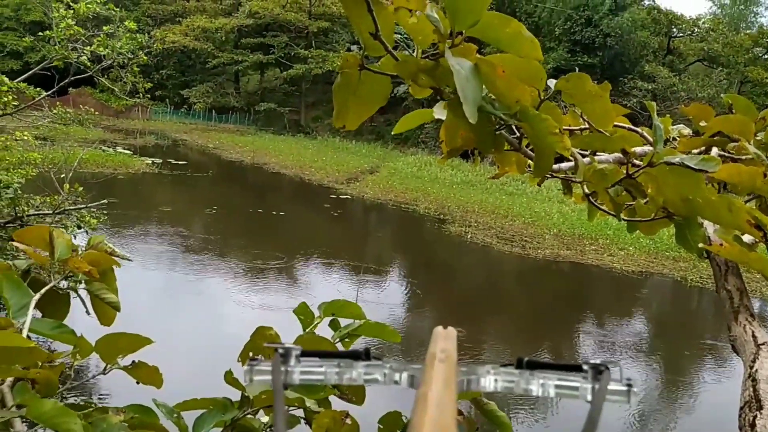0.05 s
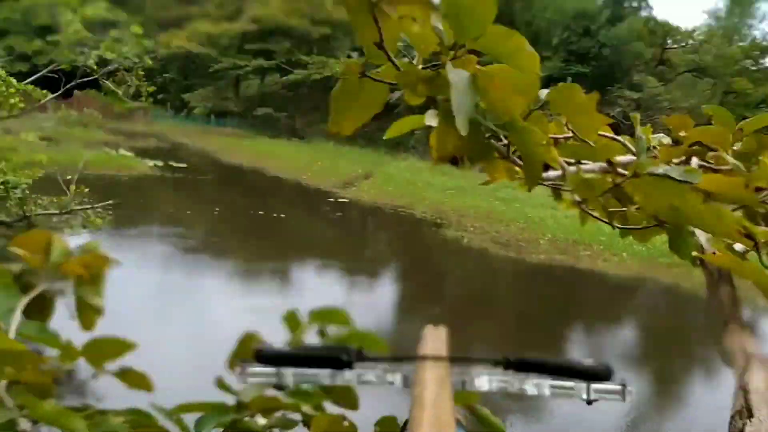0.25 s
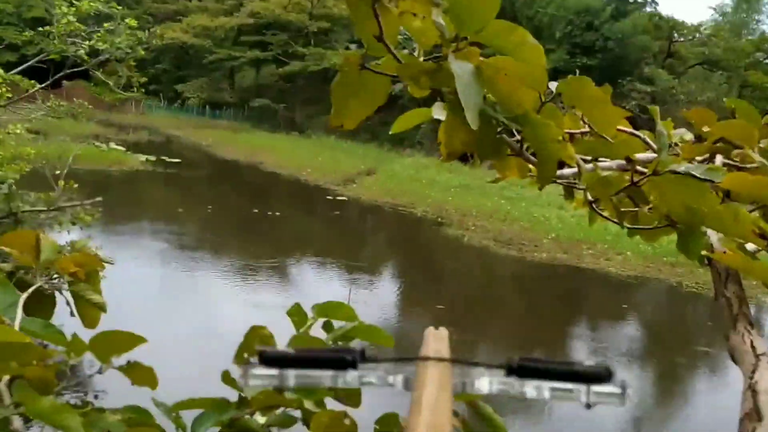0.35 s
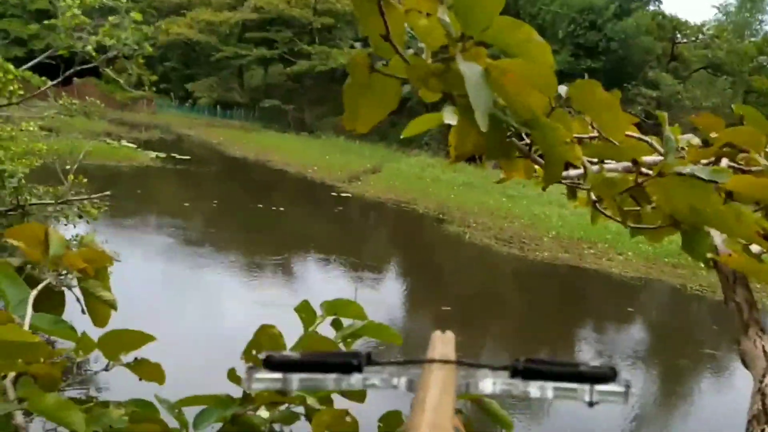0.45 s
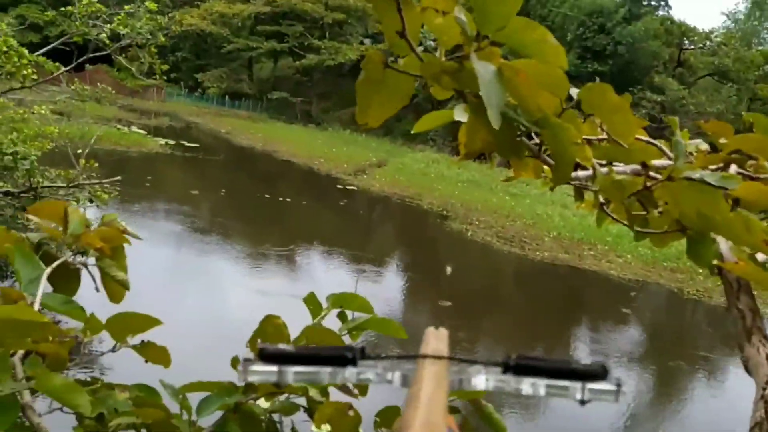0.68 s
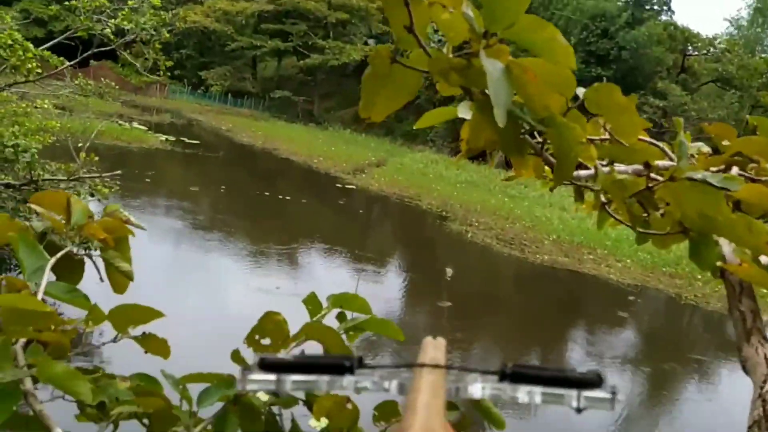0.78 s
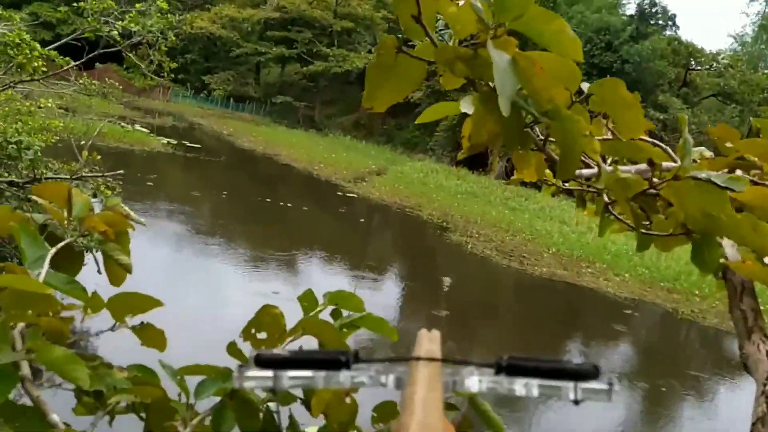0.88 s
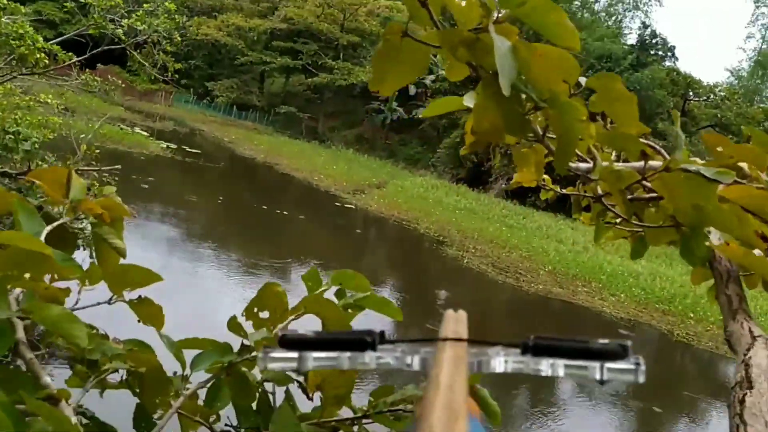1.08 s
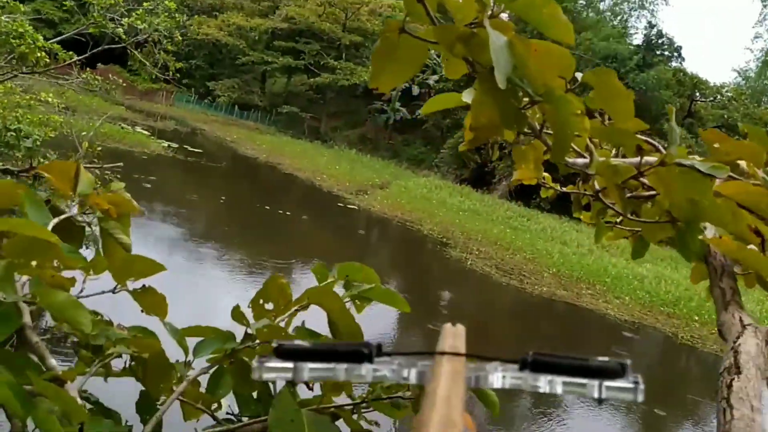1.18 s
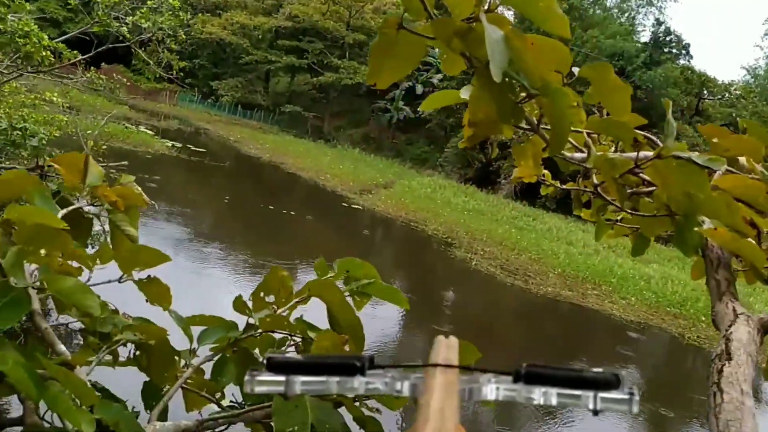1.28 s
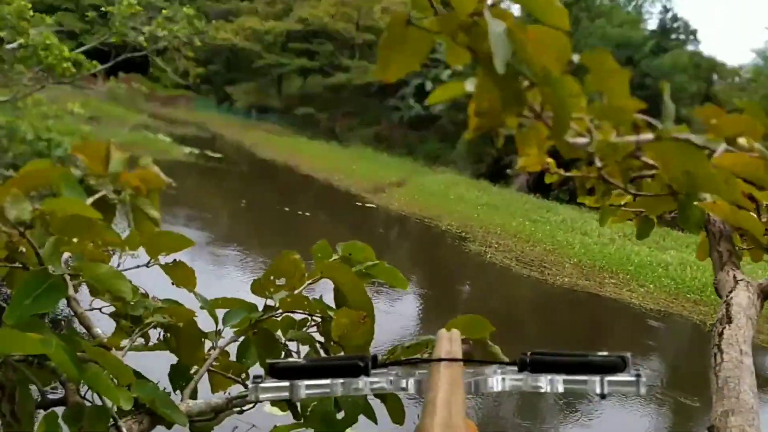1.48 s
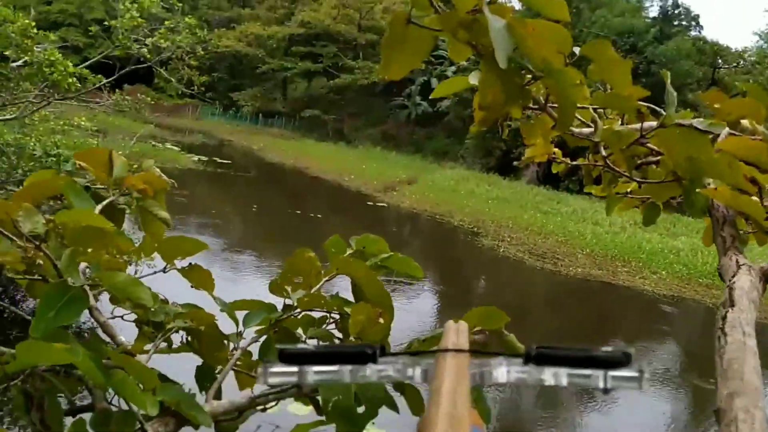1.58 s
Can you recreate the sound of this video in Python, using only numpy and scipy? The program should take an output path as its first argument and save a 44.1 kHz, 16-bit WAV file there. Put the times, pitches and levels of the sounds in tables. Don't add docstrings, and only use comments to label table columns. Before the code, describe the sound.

A homemade crossbow fires right beside a small camera microphone: hard latch snap, overloaded band slaps, whirring reel and running line, a metallic knock, then soft handling thumps and wooden creaks by a quiet pond.

```python
import sys
import numpy as np
from scipy import signal
from scipy.fft import rfft, irfft
from scipy.io import wavfile
from scipy.ndimage import uniform_filter1d

SR = 44100
rng = np.random.default_rng(int(sys.argv[2]) if len(sys.argv) > 2 else 0)


def attenuation_scalar(level_db):
    decades = np.asarray(level_db, float) / 20
    return 10 ** decades


def waveform_to_disk(signal):
    frames = np.transpose(np.atleast_2d(signal))
    scaled = np.clip(frames, -1, 1) * 32767
    samples = np.round(scaled).astype(np.int16)
    wavfile.write(sys.argv[1], SR, samples)


N = 72765


def unit_rms(x):
    return x / np.sqrt(np.mean(x ** 2) + 1e-20)


def curve(table, column):
    columns = np.transpose(table)
    return np.interp(np.arange(N) / SR, columns[0], columns[column])


def span(table):
    t = np.arange(N) / SR
    opening = np.clip((t - table[0][0]) / 0.0018, 0, 1)
    closing = np.clip((table[-1][0] - t) / 0.042 + 1, 0, 1)
    return opening * closing


def coloured(x, points):
    f, db = np.transpose(points)
    hz = np.fft.rfftfreq(len(x), 1 / SR) + 1
    gain = attenuation_scalar(np.interp(np.log(hz), np.log(f), db, -60, -90))
    return unit_rms(irfft(rfft(x) * gain, len(x)))


def add(mix, s, sound):
    part = mix[round(s * SR):][:len(sound)]
    part += sound[:len(part)]


def resonate(x, hz, width):
    r = np.exp(-np.pi * width / SR)
    return signal.lfilter([1 - r, 0, r - 1], [1, -2 * r * np.cos(2 * np.pi * hz / SR), r * r], x)


def resonate_twice(x, hz, width):
    return unit_rms(resonate(resonate(x, hz, width), hz, width))


def clicks(per_s, spread_db):
    chance, sign, size = rng.random((N, 3)).T
    return (chance < per_s / SR) * np.sign(sign - .5) * attenuation_scalar(-spread_db * np.log(size + 0.01))


def ringing(t, modes):
    return sum(attenuation_scalar(db - 60 * t / t60) * np.sin(2 * np.pi * hz * t) for hz, db, t60 in modes)


def knock(peaks, db, rise_s, hold_s, t60):
    t = np.arange(0, .12, 1 / SR)
    chatter = rng.standard_normal(len(t)) * (rng.random(len(t)) < .2)
    body = unit_rms(sum(attenuation_scalar(level) * resonate_twice(chatter, hz, 2 * width) for hz, width, level in peaks))
    return np.minimum(t / rise_s, 1) ** 2 * attenuation_scalar(db - 60 * np.maximum(t - hold_s, 0) / t60) * body


def wooden_knocks(table):
    out, t = np.zeros(N), np.arange(0, .08, 1 / SR)
    noise = rng.standard_normal((len(table), len(t)))
    for (s, db, hz, t60, treble_db), n in zip(table, noise):
        mode = np.sin(2 * np.pi * hz * t) + .45 * resonate_twice(n, hz, 800)
        tick = resonate_twice(n, 3600, 6500) * attenuation_scalar(treble_db - 60 * t / .006)
        rise_s, hold_s = .0012, .003
        shape = np.minimum(t / rise_s, 1) * attenuation_scalar(-60 * np.maximum(t - hold_s, 0) / t60)
        add(out, s, attenuation_scalar(db) * (shape * mode + tick))
    return out


# (frequency [Hz], density [dB per Hz])
OPEN_AIR = [(18, -50), (30, -33), (75, -0.5), (243, -9), (372, -6.5), (639, -24), (3390, -28.5),
            (5430, -12), (8300, -27), (10800, -54), (18300, -120)]


def pond():
    air_db, insect_db, throb_db = -60.5, -69.5, 1
    air_noise, wings, drift = rng.standard_normal((N, 3)).T
    throb = attenuation_scalar(throb_db * unit_rms(uniform_filter1d(drift, 900)))
    insects = resonate_twice(wings, 5160, 270)
    return attenuation_scalar(air_db) * coloured(air_noise, OPEN_AIR) + attenuation_scalar(insect_db) * throb * insects


# (time [s], level [dB], pitch [Hz], length [s])
THUMPS = [(0.228, -10.5, 61.9, 0.062), (0.258, -6, 89.3, 0.047), (0.321, -12.5, 77.3, .09),
          (.275, -13.5, 202, 0.026), (0.289, -16.5, 282, 0.034), (.345, -17.5, 84.1, 0.09),
          (0.461, -23, 85, 0.055), (0.58, -46, 68.7, 0.091), (0.771, -43, 78.3, 0.22),
          (0.881, -29, 79.4, 0.037), (0.914, -31.5, 68.8, 0.076), (0.982, -43, 64, 0.15),
          (1.079, -29, 80, 0.06), (1.12, -31.5, 71.4, 0.062), (1.168, -21, 115, 0.019),
          (1.181, -25.5, 61.6, 0.032), (1.216, -32, 59.6, 0.072), (1.3, -37, 69, 0.03),
          (1.351, -28, 77.3, 0.068), (1.415, -31.5, 66, 0.042), (1.465, -40, 70, 0.028),
          (1.497, -45, 65, .05), (1.539, -32, 347, 0.017), (1.54, -29.5, 197.4, 0.039),
          (1.562, -26.5, 75, 0.046), (1.591, -28.5, 66.5, 0.067)]


def low_thumps():
    out = np.zeros(N)
    noise = rng.standard_normal((len(THUMPS), 9000))
    for (s, db, hz, length), n in zip(THUMPS, noise):
        u = np.arange(0, min(2 * length, .2), 1 / SR) / length
        rough = unit_rms(resonate(n, 1.55 * hz, 47))[:len(u)]
        swing = np.sin(2 * np.pi * hz * length * u) + 0.15 * rough
        swell = 30 * u ** 2 * np.exp(-5 * u) * np.cos(u * np.pi / 4)
        add(out, s, attenuation_scalar(db) * swell * swing)
    return out


# (time [s], peak level [dB], pitch [Hz], t60 [s], treble [dB])
HAND_CREAKS = [(.895, -41, 935, 0.033, -20), (1.018, -51, 891, 0.018, -25), (1.038, -41, 747, 0.051, -24),
               (1.086, -44, 1163, .03, -21), (1.169, -41, 931, 0.029, -26.5), (1.184, -40, 800, 0.017, -27),
               (1.23, -44, 1300, 0.059, -28), (1.2762, -30.5, 923, 0.0099, -36),
               (1.2775, -58, 2220, .015, -30), (1.306, -33.5, 824, .03, -31),
               (1.311, -35, 1923, 0.015, -1.5), (1.312, -44, 3200, 0.0073, -32.5),
               (1.3145, -31.5, 1054, 0.055, -20), (1.3505, -38, 1300, 0.017, -37),
               (1.351, -48, 2000, 0.013, -20), (1.3758, -29, 1002, 0.023, -9.5),
               (1.377, -55, 2250, 0.017, -22), (1.379, -50.5, 2690, 0.038, -25),
               (1.4396, -45, 1010, 0.018, 7), (1.5175, -36.5, 923, 0.027, -27),
               (1.518, -46.5, 2350, .012, -21), (1.5225, -41, 1000, .03, -33),
               (1.539, -40, 1005, 0.024, -20), (1.554, -32, 947, 0.031, -24),
               (1.58, -35.5, 1100, 0.029, -15), (1.593, -43.5, 1096, .06, -28),
               (1.6235, -40, 840, 0.026, -37), (1.6358, -28.5, 800, 0.025, -21),
               (1.637, -37, 1395, .018, -30)]


def creaks():
    return wooden_knocks(HAND_CREAKS)


# (time [s], turning tone [Hz], level [dB])
SPOOL_TURN = [
    (.33, 274.6, -33.5),
    (.43, 249.8, -38),
    (.504, 230.1, -40.5),
    (.566, 218.2, -28.5),
    (.588, 218, -33),
    (.603, 216.5, -21.5),
    (.64, 206, -39),
    (.67, 213.5, -41),
    (.72, 221, -62),
]
# (multiple of turning tone, level [dB])
FRAME_BUZZ = [(2, -35), (3, -36)]
# (time [s], reel rattle [dB], line hiss [dB])
LINE_RUN = [(.3, -26, -58), (.4, -36.5, -43), (.52, -34.5, -47), (.58, -41, -47), (.67, -41, -48.5),
            (.755, -40, -52.5), (.775, -47, -58), (.8, -43.5, -59), (.9, -45, -51.5), (.99, -50, -61),
            (1.14, -56, -70), (1.24, -48.5, -62), (1.34, -48.5, -63), (1.49, -53.5, -66),
            (1.535, -48, -58.5), (1.56, -41.5, -46), (1.6, -52.5, -57.5), (1.65, -43, -98)]
# (frequency [Hz], width [Hz], level [dB])
HOUSING = [(411.6, 51, 8.5), (642.6, 25, 7.5), (800, 47, 9.5), (1050, 60, 12), (1300, 120, 12),
           (1680, 130, -2.5)]
# (frequency [Hz], density [dB per Hz])
LINE_HISS = [(1000, -41), (1800, 3.5), (2500, -2), (3400, -0.5), (4300, -7.5), (5400, -2.5), (7600, -3.5),
             (8600, -22.5)]
# (time [s], level [dB])
HANDLE = [
    (.6, -45),
    (.66, -46.5),
    (.72, -42),
    (.765, -57),
    (.8, -80),
]


def reel():
    t = np.arange(N) / SR
    turn = 2 * np.pi * np.cumsum(curve(SPOOL_TURN, column=1)) / SR
    tone = np.sin(turn) * attenuation_scalar(curve(SPOOL_TURN, column=2)) * span(SPOOL_TURN)
    buzz = sum(attenuation_scalar(db) * np.sin(k * turn) for k, db in FRAME_BUZZ)
    buzz = buzz * np.exp(-((t - .603) / .012) ** 2)

    knocks = clicks(per_s=810, spread_db=2.5)
    rattle = 0
    for hz, width, db in HOUSING:
        settle_db = -3 * (hz > 1200) * np.clip(10 * (t - 1.32), 0, 1)
        rattle = rattle + attenuation_scalar(db) * resonate_twice(knocks, hz, 2.2 * width) * attenuation_scalar(settle_db)
    rattle = unit_rms(rattle)
    handle = resonate_twice(knocks, 1378, 120) * attenuation_scalar(curve(HANDLE, column=1)) * span(HANDLE)

    hiss = coloured(clicks(per_s=2000, spread_db=0), LINE_HISS)
    rumble = attenuation_scalar(-17) * resonate_twice(rng.standard_normal(N), 70, 60)
    running = (rattle + rumble) * attenuation_scalar(curve(LINE_RUN, column=1)) + hiss * attenuation_scalar(curve(LINE_RUN, column=2))
    return np.sqrt(2) * (tone + buzz) + running * span(LINE_RUN) + handle


# (frequency [Hz], width [Hz], level [dB])
STOP_PEAKS = [(1300, 400, 0.5), (1930, 89, -3), (3300, 400, -5), (4600, 260, -19.5), (5610, 230, -10),
              (6320, 480, -13.5), (7270, 230, -22)]
# (frequency [Hz], level [dB], t60 [s])
STOP_BODY = [(745, -4, 0.035), (1266, -6.5, 0.052), (395, -6, 0.024)]
# (frequency [Hz], level [dB], t60 [s])
METAL_RING = [(2013, -17, .16), (3661, -42, .8)]


def metal_stop():
    out, t = np.zeros(N), np.arange(0, .5, 1 / SR)
    hit_s, ring_lag_s = .4812, .006
    add(out, hit_s, knock(STOP_PEAKS, db=-10.5, rise_s=0.0005, hold_s=0.0051, t60=0.019))
    add(out, hit_s, np.minimum(t / 0.0051, 1) * ringing(t, STOP_BODY))
    add(out, hit_s + ring_lag_s, np.minimum(t / 0.0062, 1) * ringing(t, METAL_RING))
    return out


# (time [s], peak level [dB], pitch [Hz], t60 [s], treble [dB])
NEAR_KNOCKS = [(0.2324, -19.5, 2058, 0.033, -33), (.2485, -8, 495, 0.015, -4.5),
               (.2565, -9, 450, 0.012, -9), (.262, -10.5, 700, 0.022, -20.5),
               (.2685, -9.5, 880, 0.028, -11.5), (.2795, -6, 781, 0.038, -1.5),
               (.2915, -2.5, 670, 0.022, -27.5), (.293, -23, 2870, .012, -20),
               (.283, -12.5, 600, 0.034, -24), (.3005, -9, 800, 0.075, -28),
               (.3145, -29.5, 750, .02, -6.5), (.318, -31.5, 710, .02, 1),
               (.3215, -13, 653, 0.012, -19.5), (.3305, -12, 800, 0.025, -15.5),
               (.3435, -20.5, 800, 0.024, -4), (.357, -24, 745, 0.04, 1.5),
               (.4325, -27.5, 1050, 0.022, -21), (.452, -30, 1140, 0.048, -22),
               (0.4705, -18, 800, 0.0061, -9.5), (.4745, -19.5, 1070, 0.045, -26),
               (0.4813, -17, 1232, .026, 11), (.4815, -16, 5950, 0.006, -4),
               (.491, -16.5, 1085, 0.02, -28), (.5145, -20.5, 930, 0.02, -10.5),
               (0.671, -31, 1334, 0.015, -23), (0.693, -40.5, 1300, 0.028, 3.5),
               (0.711, -34, 1350, 0.035, -6), (.786, -38, 677, 0.056, -25),
               (.787, -41, 1300, 0.051, -20)]


def slaps_and_knocks():
    return wooden_knocks(NEAR_KNOCKS)


# (frequency [Hz], width [Hz], level [dB])
LATCH_PEAKS = [(1332, 130, -27), (2075, 240, 4), (2910, 75, -5.5), (3550, 100, -8), (4830, 330, -0.5),
               (6290, 710, 6.5), (6920, 100, -5.5), (6920, 66, -12.5)]
# (time [s], level [dB])
STOCK_SHAKE = [
    (.236, -19),
    (.25, -16),
    (.283, -10),
    (.305, -20.5),
    (.318, -24.5),
    (.336, -24),
    (.35, -43),
    (.385, -27.5),
    (.42, -62),
]
# (frequency [Hz], level [dB], t60 [s], extra fade once bands are slack [dB/s])
STOCK_MODES = [(230.5, -13.5, 0.22, 292.5), (323, 5.5, 0.013, 252), (456.7, -0.5, 0.037, 147.5),
               (555, 4, 0.025, 61), (665.4, -1.5, 0.32, 4.5), (796, -4, 0.009, 1), (920, -17, 0.013, 24.5),
               (1043, -6.5, 0.054, 60), (1200, -30, .04, 101.5)]
# (frequency [Hz], density [dB per Hz])
RAIL_RASP = [(530, -36), (900, -0.5), (1290, 3.5), (1590, -3.5), (2180, -2.5), (7150, -12), (8300, -22.5),
             (10800, -53), (18300, -120)]


def release():
    t = np.arange(N) / SR
    slack = np.clip(t - .275, 0, .08)
    slaps = clicks(per_s=700, spread_db=-1.5)
    wood = 0
    for hz, db, t60, fade in STOCK_MODES:
        wood = wood + attenuation_scalar(db) * unit_rms(resonate(slaps, hz, 1.2 / t60)) * attenuation_scalar(-fade * slack)
    wood = unit_rms(wood)

    rasp_db, rasp_hold_s, rasp_fall_db_s = -12, 0.2637, 456.5
    rasp = coloured(clicks(per_s=4500, spread_db=2.7), RAIL_RASP)
    rasp = rasp * attenuation_scalar(rasp_db - rasp_fall_db_s * np.maximum(t - rasp_hold_s, 0))
    out = (wood * attenuation_scalar(curve(STOCK_SHAKE, column=1)) + rasp) * span(STOCK_SHAKE)
    add(out, .2325, knock(LATCH_PEAKS, db=-3.5, rise_s=0.0028, hold_s=0.0031, t60=0.054))
    return out


def bank_echo(near):
    level_db, t60 = -30.5, 0.65
    t = np.arange(SR // 2) / SR
    tail = rng.standard_normal(len(t)) * (t > .01) * attenuation_scalar(-60 * t / t60)
    return attenuation_scalar(level_db) * signal.fftconvolve(near, tail / np.linalg.norm(tail))[:N]


def scene():
    near = creaks() + reel() + metal_stop() + slaps_and_knocks() + release()
    return (pond() + low_thumps() + near + bank_echo(near))[None]


def top_cut(x):
    return signal.sosfilt(signal.butter(12, 15760, fs=SR, output="sos"), x)


def record(dry):
    loaded = 1.09 * np.tanh(dry / 0.85)
    low_cut = signal.lfilter(*signal.butter(2, 30, "high", fs=SR), loaded)
    band_limit = signal.firwin(161, 7950, window=("kaiser", 8), fs=SR)
    narrow = 0.86 * signal.oaconvolve(low_cut, band_limit[None], "same")
    capped = narrow / (1 + narrow ** 20) ** .05
    hiss = attenuation_scalar(-81.5) * rng.standard_normal(dry.shape)
    return top_cut(capped + hiss)


dry = scene()
out = record(dry)
waveform_to_disk(out)
```